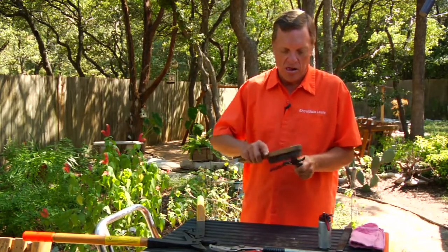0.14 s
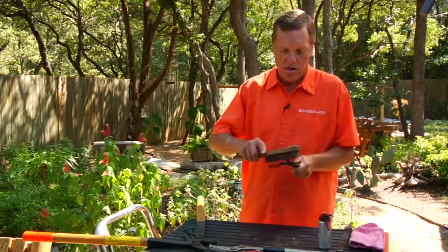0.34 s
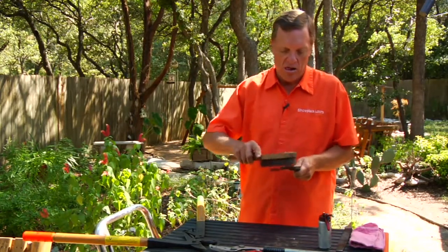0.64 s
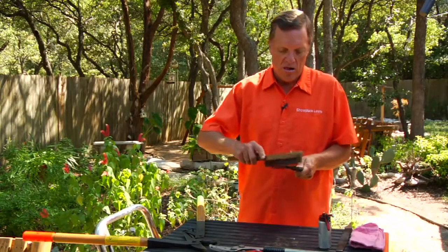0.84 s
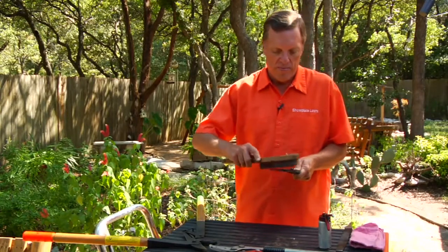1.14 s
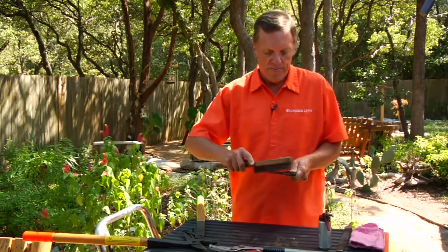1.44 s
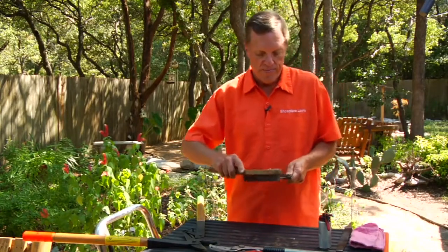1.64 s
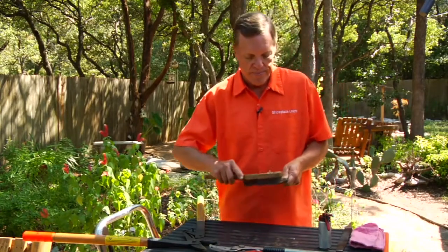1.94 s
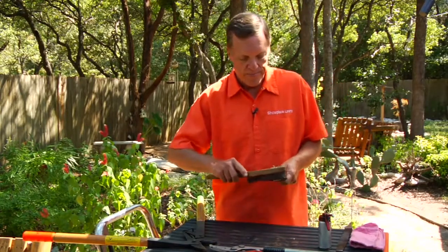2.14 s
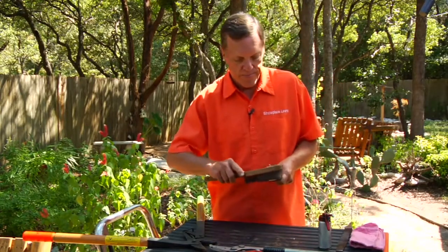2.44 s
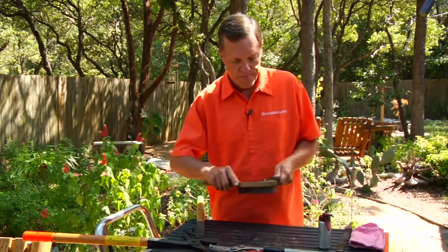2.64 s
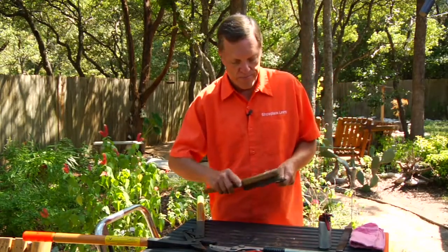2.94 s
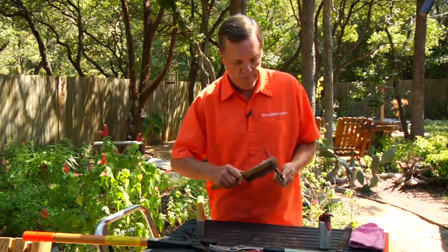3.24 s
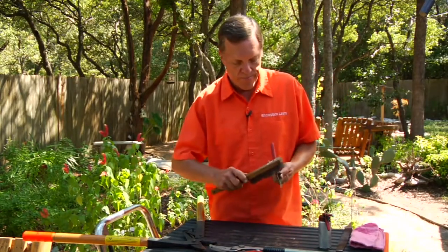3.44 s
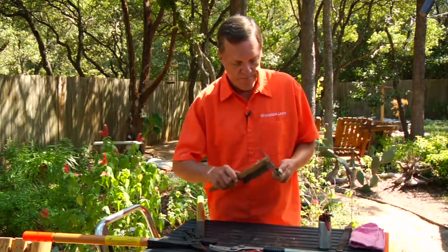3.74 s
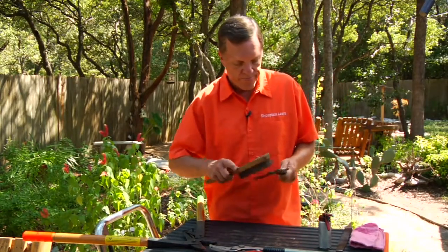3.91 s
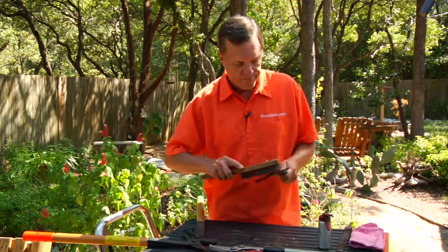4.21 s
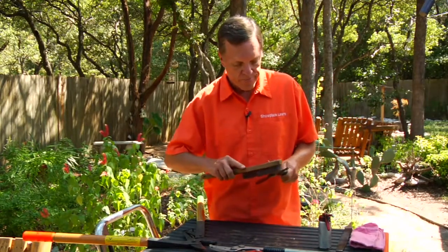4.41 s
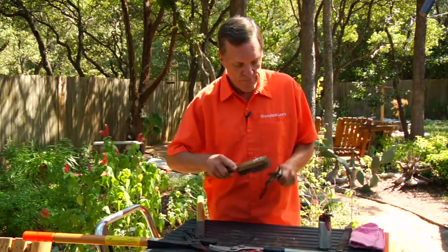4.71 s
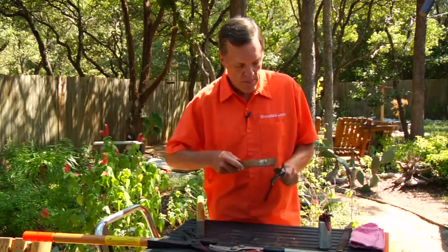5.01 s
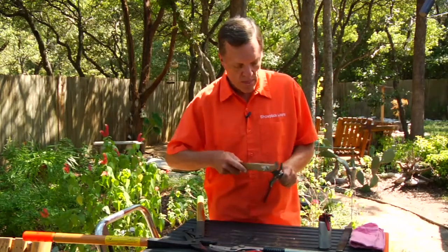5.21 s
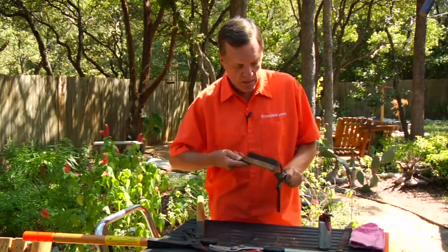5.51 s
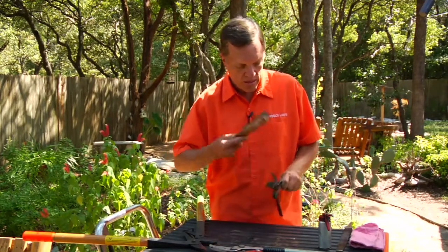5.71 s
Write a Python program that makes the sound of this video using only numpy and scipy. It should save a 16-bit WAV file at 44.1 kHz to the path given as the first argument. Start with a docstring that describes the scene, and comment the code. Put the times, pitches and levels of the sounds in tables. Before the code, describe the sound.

A stiff wire brush scrubs steel pruner jaws in short, scratchy, uneven strokes, with faint metallic rings and soft cloth rumble outdoors.

```python
"""A garden: a stiff wire brush scrubs the steel jaws of hand pruners, heard by one lapel microphone. Bristles
scratch as dense, uneven noise and plucked wires; whole tufts snap off the blade edges as short bursts. Both
drive resonances of the wires, the jaws, the blade tip and the wooden handle, which also gives a low knock. The
blade rings free now and then as damped tones, small dull taps tick, and the yard answers with a faint tail. The
working arm rumbles through the shirt; far traffic and microphone hiss fill the gaps."""
import sys
import numpy as np
from scipy import signal
from scipy.fft import rfft, irfft, next_fast_len
from scipy.io import wavfile
from scipy.ndimage import uniform_filter1d, map_coordinates

SR = 44100
rng = np.random.default_rng(int(sys.argv[2]) if len(sys.argv) > 2 else 0)


def int16_out(signal):
    """Quantize to a 16-bit WAV file."""
    q = np.round(np.clip(np.atleast_2d(signal).T, -1, 1) * 32767)
    wavfile.write(sys.argv[1], SR, q.astype(np.int16))


N = 258514

# Strokes of the brush along the blade: (touch time [s], rise [s], hold [s], scratch at full press [dB],
# scratch at lift [dB], trailing wires [dB], then rings against the scratch at touch: jaw [dB], tip [dB],
# handle [dB]; loudest tip mode: pitch at touch [Hz], pitch at lift [Hz], drive gain at lift [dB])
STROKES = [(0.202, .095, 0.12, -44, -60, -86.5, -1.5, -7, -8, 4250, 4170, -7),
           (0.553, 0.072, 0.07, -48, -49, -79, -3.5, -8, -16, 4150, 4070, 0.5),
           (0.953, 0.079, 0.05, -46, -55, -68.5, -3, -8, -15.5, 4000, 4002, 1),
           (1.267, 0.068, 0.039, -47, -45, -66.5, -3.5, -10.5, -14, 3930, 4160, 1),
           (1.577, 0.069, 0.052, -44.5, -60, -67.5, -3.5, -7.5, -10, 4150, 4150, 0),
           (1.903, 0.08, 0.052, -43.5, -58.5, -82.5, -6, -7.5, -12, 4250, 4130, 0.5),
           (2.262, .04, 0.081, -46.5, -52, -87, -6.5, -4, -15, 4300, 4300, -2),
           (2.576, 0.08, 0.019, -41.5, -41.5, -71.5, -3.5, -4, -11, 4300, 4300, -3.5),
           (2.958, 0.043, .033, -42, -47, -70, -8, -7, -12, 4350, 4170, -2),
           (3.555, 0.09, 0.018, -50, -46.5, -73, -7, -4, 0.5, 4350, 4300, -5),
           (4.252, 0.1045, 0.0552, -54.5, -62.5, -81, 3, -3, -2.5, 4100, 3920, -1.5),
           (4.405, 0.0433, 0.068, -61.5, -58.5, -66.5, 3.5, -4, -4, 4100, 3830, -9),
           (4.532, .13, 0.044, -45.5, -56, -74, -0.5, -5.5, -4, 3800, 4190, -1.5),
           (5.136, 0.0068, 0.0723, -67.5, -67, -82.5, 5.5, -2.5, -1, 4450, 4490, -5),
           (5.277, 0.0078, 0.174, -72.5, -66.5, -62, 6, -3, 2.5, 4450, 4450, -3.5),
           (5.518, .01, 0.078, -58.5, -69, -68, 3, -2, 3, 4450, 4450, -0.5),
           (5.588, 0.047, 0.048, -51.5, -68, -83, 4.5, -5.5, 5.5, 4450, 4535, -2.5)]
# Jolts at landings and within strokes shake the microphone and knock the handle: (time [s], jolt dip [dB],
# knock drive [dB])
JOLTS = [(0.165, -53, -49), (0.227, -57, -55.5), (0.681, -56, -41.5), (1.234, -47.5, -45),
         (1.37, -70.5, -45), (1.882, -41.5, -39.5), (2.203, -52, -55), (2.661, -45.5, -40.5),
         (2.672, -75.5, -45.5), (2.937, -37, -43.5), (3.016, -51, -45), (5.143, -57, -67),
         (5.621, -59, -42), (5.637, -71, -39)]


def amp(db):
    """Decibels to gain."""
    return 10 ** (np.asarray(db) / 20)


def unit(x):
    """Scaled to rms 1."""
    return x / np.sqrt(np.mean(x ** 2) + 1e-20)


def along(points, hz):
    """(Hz, value) points read on a log frequency axis."""
    f, v = np.transpose(points)
    return np.interp(np.log(hz + 1), np.log(f + 1), v)


def curves(rows):
    """One value per sample for each column after the time."""
    s, *columns = np.transpose(rows)
    return [np.interp(np.arange(N) / SR, s, column) for column in columns]


def wobble(rate):
    """A smooth random curve, rate knots a second."""
    knots = rng.standard_normal(int(N * rate / SR) + 4)
    return map_coordinates(knots, [np.arange(N) * rate / SR])


def filtered(x, response):
    """x through a frequency response, scaled so that white noise keeps its power."""
    m = next_fast_len(N + SR // 2)
    gain = response(np.fft.rfftfreq(m, 1 / SR))
    gain = gain / np.sqrt(np.mean(abs(gain) ** 2))
    return irfft(rfft(x, m) * gain, m)[:N]


def modes(table):
    """Causal resonances with steep skirts: each acts twice, the second time three times as wide."""
    def one(f, centre, width):
        return 1j * f * width / (centre * centre - f * f + 1j * f * width)

    def response(f):
        total = 0
        for k, (centre, width, db) in enumerate(table):
            sign = (-1) ** k  # neighbours alternate in polarity
            total = total + sign * amp(db) * one(f, centre, width) * one(f, centre, 3 * width)
        return total
    return response


def colour(points):
    """A smooth spectrum through (Hz, dB) points."""
    return lambda hz: amp(along(points, hz))


def garden():
    """Far traffic, slightly uneven, over steady hiss: two coloured noises."""
    # Slow course of the traffic: (time [s], level [dB])
    traffic_course = [(0, -69.5), (.64, -66), (1.9, -67.5), (2.68, -67), (3.38, -70), (3.7, -67),
                      (4.03, -70), (4.65, -66), (5.04, -68.5), (5.86, -67.5)]
    # Spectrum of the far traffic: (frequency [Hz], relative density [dB per Hz])
    traffic_colour = [(71, -28), (120, -5), (226, -9), (284, -9.5), (414, -9), (449, -10), (942, -12.5),
                      (1950, -25.5), (3000, -50), (3900, -66), (6600, -120)]
    # Spectrum of the microphone hiss: (frequency [Hz], relative density [dB per Hz])
    hiss_colour = [(1000, -12.5), (2500, 3.5), (5000, -1.5), (8000, -3.5), (12000, -2.5), (16000, -0.5)]
    hiss_db = -79
    level = amp(curves(traffic_course)[0] + 0.23 * wobble(11))
    traffic = level * filtered(rng.standard_normal(N), colour(traffic_colour))
    hiss = amp(hiss_db) * filtered(rng.standard_normal(N), colour(hiss_colour))
    return traffic + hiss


def shirt(press):
    """The arm rumbles the microphone on the cloth, more while it works; a jolt dips fast and rebounds slower."""
    # Rumble before effort and wobble: (time [s], level [dB])
    arm_course = [(0, -68), (.23, -58), (.44, -69), (.78, -63), (1.19, -69.5), (1.6, -62.5), (1.83, -69),
                  (1.89, -57.5), (2.15, -69), (2.66, -66), (2.92, -73), (2.94, -65), (3.07, -65.5),
                  (3.36, -74.5), (3.62, -64.5), (3.95, -77.5), (4.42, -65.5), (5.07, -69), (5.63, -65),
                  (5.86, -70)]
    # Spectrum of the cloth rumble: (frequency [Hz], relative density [dB per Hz])
    cloth_colour = [(15, -8), (25, -2), (45, -4.5), (80, -4.5), (130, -20.5), (250, -47.5)]
    effort_db, effort_from_db, effort_s = 3, -63, 0.013  # most extra rumble; half-way scratch level; smoothing
    jolts, t = np.zeros(N + SR), np.arange(SR // 20) / SR
    dip = np.exp(-((t - .002) / 0.0017) ** 2)
    rebound = .5 * np.exp(-((t - .008) / 0.0036) ** 2)
    for s, db, _ in JOLTS:
        jolts[round(s * SR):][:len(t)] += amp(db) * (rebound - dip)
    working = uniform_filter1d(press / (press + amp(effort_from_db)), round(effort_s * SR))
    level = amp(curves(arm_course)[0] + effort_db * working + 1.5 * wobble(9.3))
    return jolts[:N] + level * filtered(rng.standard_normal(N), colour(cloth_colour))


def crowd(gains, count):
    """Lesser snaps at random moments, about as strong and as ringing as the scratch around them."""
    over_scratch_db, scatter_db = -1, 3
    steel_db, wood_db, ring_scatter_db = -1, -1, 3  # rings over those of the scratch
    s = rng.random(count) * N / SR
    chance = rng.standard_normal((count, 3))
    db, jaw_db, _, handle_db = 20 * np.log10(gains[:, (s * SR).astype(int)] + 1e-9)
    rings_db = np.c_[jaw_db - db + steel_db, handle_db - db + wood_db]
    burst_db = db + over_scratch_db + scatter_db * chance[:, 0]
    return np.c_[s, burst_db, rings_db + ring_scatter_db * chance[:, 1:]]


def snap_shape():
    """Sharp rise and a 60 dB fall in 14 ms."""
    t = np.arange(SR // 30) / SR
    return amp(-60 * t / .014) * (1 - np.exp(-t / .0005))


def add_snaps(drive, gains, wires):
    """Tufts snap as noise bursts that drive the wires, the jaws, the tip, the handle and its low knock."""
    # Tufts heard singly as they land or snap free:
    # (time [s], burst [dB], steel ring against burst [dB], wood ring against burst [dB])
    single_snaps = [(.1632, -43, 0.5, -13), (.1824, -46, 4, -3), (.209, -55, -18, -25),
                    (.217, -53.5, -2.5, -12), (.225, -34.5, 4.5, -10), (.2375, -34, -20, -13),
                    (.2575, -31, -12, -14), (.2661, -39, -8, -13), (.2834, -48, -17, -14),
                    (.3113, -43, 7.5, -14.5), (.3362, -43, 4, -20), (.3581, -37.5, -5.5, -22),
                    (.4999, -54, 2, 9), (.5839, -48, -7, -10.5), (.619, -42.5, -2, -3),
                    (.6286, -38, -25, -30), (.641, -38, -27, -34), (.653, -37, -20, -25),
                    (.664, -33, -12, -24), (.6754, -29, -15.5, -28.5), (.6929, -35.5, -17, -22),
                    (.9234, -48, -23.5, -19.5), (.9498, -56.5, -1.5, -9), (.9693, -41, -2, -11),
                    (1.0379, -33, -26, -32.5), (1.0486, -40.5, -20.5, -33.5), (1.0631, -30, -17, -32),
                    (1.0791, -41, -9, -25), (1.2326, -40, -3.5, -22), (1.2432, -39.5, 2, -8.5),
                    (1.2736, -48, 3, -17), (1.2808, -46, -2, -19), (1.334, -33.5, -9, -14.5),
                    (1.35, -40, -9, -28), (1.3699, -35.5, -15, -25.5), (1.54, -49.5, -3.5, -17.5),
                    (1.5473, -47, -3, -15), (1.5768, -44.5, 0.5, -6), (1.6073, -44.5, -1, -4),
                    (1.6505, -30, -11.5, -20), (1.6629, -32, -17, -32), (1.6702, -37.5, -15, -24),
                    (1.6821, -32.5, -24, -30), (1.6939, -37, -11, -26), (1.882, -45, 11.5, -6),
                    (1.8872, -44, 1.5, -2), (1.9151, -35.5, -4, -11), (1.9552, -43.5, -9, -16),
                    (1.9903, -31.5, -41, -19), (2.002, -32, -27, -33), (2.0215, -48, -2, -25),
                    (2.0289, -35, -33, -18), (2.0384, -40.5, -17, -8), (2.196, -49.5, -8.5, -20),
                    (2.203, -38, 0.5, -17), (2.2329, -54, -9, -11), (2.2625, -55, 2, -22),
                    (2.3294, -38, -12, -16), (2.3455, -35, -14, -20), (2.353, -36.5, -8, -17),
                    (2.3611, -34.5, -16, -27), (2.3773, -34.5, -25, -36), (2.5278, -59, -13.5, -26),
                    (2.5457, -46, 1, -23), (2.5844, -49.5, 1.5, -24), (2.62, -42.5, 8, -15),
                    (2.6414, -36, -0.5, -21), (2.662, -29, -14, -21), (2.6718, -37.5, -12, -25),
                    (2.9368, -29, -1.5, -13.5), (2.9449, -50, 11, 2), (2.9503, -36, -9, -10),
                    (2.9629, -42.5, 2, -5), (2.995, -42, -19, -22.5), (3.004, -39, -11.5, -21),
                    (3.008, -29.5, -10, -20), (3.0141, -31.5, -9.5, -14.5), (3.0226, -30, -11, -21),
                    (3.0286, -31.5, -15, -15), (3.4621, -53.5, 0.5, -10), (3.492, -62, 5, -7),
                    (3.504, -66.5, -4.5, -2.5), (3.5417, -47.5, -9, -5), (3.5504, -48, 1, -2),
                    (3.5762, -52, 2, -16), (3.5929, -34.5, -4.5, -25), (3.6108, -50, -14, -8),
                    (3.62, -36.5, -10, -29), (3.6335, -39, -10, -9), (3.6424, -31.5, -17, -30),
                    (3.6635, -38, -6, -14.5), (3.8499, -54.5, 5, -8), (4.2555, -56.5, 0, -15.5),
                    (4.2768, -48, -11, -25), (4.3134, -42.5, -11, -5.5), (4.3395, -40, -12, -15),
                    (4.3604, -44, -4, -1), (4.382, -48, -9, 3.5), (4.4609, -60.5, -6, -12),
                    (4.4733, -54.5, 8.5, -4.5), (4.518, -54.5, -13, -18), (4.5684, -65, 12, -11),
                    (4.6524, -40, -12, -3), (4.687, -31, -16, -28), (5.1424, -41, -9, -13),
                    (5.1633, -50.5, -14, -7), (5.17, -49.5, -8, -6.5), (5.287, -44, -17.5, -8),
                    (5.2909, -45.5, -9, -6), (5.3209, -51, -18, -13.5), (5.3684, -41, -12, -15),
                    (5.404, -44.5, -6, -7.5), (5.4556, -53, -4, 1), (5.4844, -42.5, -5.5, -10),
                    (5.4928, -51, 7.5, -9.5), (5.5296, -51, 4, 4), (5.5499, -46, -11, -16),
                    (5.5826, -63, 14, 7), (5.5962, -59, 7, -8), (5.6182, -29.5, -4, -1),
                    (5.636, -34.5, 2.5, -1), (5.6502, -30.5, -13, -6)]
    tip_db, tip_share = 4, 0.56  # tip ring over that of the scratch, plus a share of the steel ring
    knock_db, knock_share = -11, 0.4  # knock against the burst, plus a share of the wood ring
    shape = snap_shape()
    size = len(shape)
    gains = np.pad(gains, ((0, 0), (0, SR)), 'edge')
    for s, db, steel_db, wood_db in np.r_[single_snaps, crowd(gains[:, :N], count=240)]:
        noise = shape * rng.standard_normal(size)
        at, burst = round(s * SR), amp(db) * np.linalg.norm(shape)
        # each snap takes the colour of the wires that it plucks
        pluck = 1.33 * noise + shape * wires[at:][:size]
        rings = amp([steel_db, tip_db + tip_share * steel_db, wood_db, knock_db + knock_share * wood_db])
        rings[1] *= gains[2, at + 88] / (gains[0, at + 88] + 1e-9)  # tip ring of the scratch 2 ms later
        drive[0, at:][:size] += burst * pluck / np.linalg.norm(pluck)
        drive[1:, at:][:, :size] += burst * rings[:, None] * noise / np.linalg.norm(noise)


def add_knocks(drive):
    """Jolts knock the handle with bursts shaped like snaps."""
    shape = snap_shape()
    for s, _, db in JOLTS:
        noise = shape * rng.standard_normal(len(shape))
        burst = amp(db) * np.linalg.norm(shape)
        drive[4, round(s * SR):][:len(shape)] += burst * noise / np.linalg.norm(noise)


def contact():
    """Gain of the scratch, then of jaw, tip and handle: strokes rise, hold and let go; landings die away."""
    # The brush lands and scuffs: (time [s], scratch [dB], t60 [s],
    # then rings against the scratch: jaw [dB], tip [dB], handle [dB])
    landings = [(.164, -61, 0.1, -9.5, -5.5, -13.5), (0.497, -60.5, 0.21, -0.5, -4, -2.5),
                (0.92, -50, .07, -3, -1.5, -13), (1.234, -59.5, 0.16, -2, -10, -12),
                (1.536, -58.5, 0.195, -4, 0, -9), (1.882, -51.5, 0.13, 3, -1, -15),
                (2.198, -52.5, 0.0754, 0, -6, -21), (2.232, -70, 1, 2, -2, -10),
                (2.526, -51.5, 0.163, -5, -2, -25), (2.938, -47, 0.099, -4.5, 1.5, -16),
                (3.455, -71.5, 0.85, 1, 1.5, -4), (3.541, -59.5, 0.33, -1, 6.5, -7),
                (3.845, -84, 0.38, -3, 0, -1), (4.212, -69.5, .3, -1, 2, -5),
                (5.232, -72, 0.44, -7, 5.5, -3)]
    # Change of the rings against the scratch from touch to lift: jaw [dB], tip [dB], handle [dB]
    slide_db = -10, 2.5, -7
    attack_bend = 1.15  # power of the rise
    release_t60, trail_t60 = 0.013, 0.38  # s
    trail_ring_db = -2  # trailing wires ring the tool less
    power = np.zeros((4, N + SR))
    for touch, rise, hold, full_db, lift_db, trail_db, *ring_db in np.array(STROKES)[:, :9]:
        t = touch + np.arange(SR // 2) / SR
        full, lift = touch + rise, touch + rise + hold
        after = np.maximum(t - lift, 0)
        along_blade = np.clip((t - touch) / (lift - touch), 0, 1)
        rising = np.minimum((t - touch) / (full - touch), 1) ** attack_bend
        held = rising * amp(np.interp(t, [full, lift], [full_db, lift_db]) - 60 * after / release_t60)
        trail = (t > lift) * amp(trail_db - 60 * after / trail_t60)
        trail = trail * amp([0, *[trail_ring_db] * 3])[:, None]
        rings = amp([0 * t, *(db + change * along_blade for db, change in zip(ring_db, slide_db))])
        power[:, round(touch * SR):][:, :len(t)] += ((held + trail) * rings) ** 2
    t = np.arange(SR // 2) / SR
    for s, db, t60, *ring_db in landings:
        scuff = amp(db - 60 * t / t60) * amp([0, *ring_db])[:, None]
        power[:, round(s * SR):][:, :len(t)] += scuff ** 2
    return np.sqrt(abs(uniform_filter1d(power[:, :N], size=88)))  # smoothed over 2 ms


def scratch(grain_db, clump_db):
    """Wire tips slip over steel: noise whose strength jumps by the millisecond and clumps by tuft row."""
    strength = amp(grain_db * wobble(700) + clump_db * wobble(140))
    return unit(rng.standard_normal(N) * strength)


def pings(count, size_db, t60):
    """Single wires plucked at random, each ringing briefly at a pitch of its own."""
    when, pitch, size = rng.random((count, 3)).T[..., None]
    k = np.arange(SR // 150)
    decay = amp(-size_db * np.log(size) - 60 * k / SR / t60)
    ring = decay * np.sin(2 * np.pi * (5500 + 10500 * pitch) * k / SR)
    return unit(np.bincount(((when * N).astype(int) + k).ravel(), ring.ravel())[:N])


def edge(drive, width_hz):
    """The loudest tip mode slides and swells along each stroke; cross-faded between fixed resonances."""
    swell_db, step_hz = 8, 150  # growth from touch to lift; spacing of the resonances
    path = []
    for touch, rise, hold, *_, from_hz, to_hz, lift_db in STROKES:
        path.append((touch, from_hz, lift_db - swell_db))
        path.append((touch + rise + hold, to_hz, lift_db))
    hz, db = curves(path)
    out = np.zeros(N)
    for centre in np.arange(3700, 4751, step_hz):
        near = np.sqrt(np.clip(1 - abs(hz - centre) / step_hz, 0, 1))
        out += filtered(drive * amp(db) * near, modes([(centre, width_hz, 0)]))
    return out


def turned_grip(wire):
    """Turning the tool shifts the level of the wires' top, above 11 kHz."""
    # Treble change as the tool turns: (time [s], gain [dB])
    grip = [(0, 2.5), (4.9, 3.5), (5.1, -2), (5.86, -4)]
    top = filtered(wire, lambda hz: hz > 11000)
    top = top * np.dot(top, wire) / np.dot(top, top)  # back to its own level within the wires
    return wire + (amp(curves(grip)[0]) - 1) * top


def brush(gains):
    """Scratch and snaps drive resonant bodies: the wires, the jaws, the tip, the handle and its low knock."""
    # Spectrum of the wires: (frequency [Hz], relative density [dB per Hz])
    wire_colour = [(3240, -13), (5500, -28.5), (6670, -7), (8560, -0.5), (11200, -3.5), (13000, -1.5),
                   (15200, -10.5), (16000, -2)]
    # Resonances of the jaws: (frequency [Hz], width [Hz], relative level [dB])
    jaw_modes = [(2299, 448, 3), (2550, 620, -1), (3152, 398, 2)]
    # Resonances of the blade tip: (frequency [Hz], width [Hz], relative level [dB])
    tip_modes = [(3660, 540, 4.5), (4820, 127, -3), (5500, 840, 4)]
    # Resonances of the wooden handle: (frequency [Hz], width [Hz], relative level [dB])
    handle_modes = [(1690, 189.4, -2), (2026, 250, -1)]
    # Low knock resonances of the handle: (frequency [Hz], width [Hz], relative level [dB])
    knock_modes = [(325, 630, 2), (683, 57, 10.5), (1225, 1140, -3.5)]
    wander_db, wander_rate = 1, 30  # each body is caught now more, now less; knots a second
    press = gains[0]
    rub = scratch(grain_db=2.0, clump_db=-1.0)
    wires = np.pad(pings(count=14000, size_db=2.5, t60=0.0145), (0, SR))
    drive = np.zeros((5, N + SR))  # wires, jaws, tip, handle, handle knock
    drive[:, :N] = rub * gains[[0, 1, 2, 3, 0]] * amp([[-2], [0], [0], [0], [-26]])
    drive[1:, :N] *= amp([wander_db * wobble(wander_rate) for _ in drive[1:]])
    drive[0, :N] += press * amp(-5.5) * wires[:N]
    add_snaps(drive, gains, wires)
    add_knocks(drive)
    wire = turned_grip(filtered(drive[0, :N], colour(wire_colour)))
    jaw = filtered(drive[1, :N], modes(jaw_modes))
    tip = amp(-4.0) * filtered(drive[2, :N], modes(tip_modes))
    loudest_tip = edge(drive[2, :N], width_hz=260)
    handle = filtered(drive[3, :N], modes(handle_modes))
    knock = filtered(drive[4, :N], modes(knock_modes))
    return wire + jaw + tip + loudest_tip + handle + knock


def ringing():
    """Damped sine tones: the blade's modes ring free, and short dull taps tick."""
    # The blade rings free, at lifts and once from a tap:
    # (time [s], low mode [dB], middle mode [dB], high mode [dB])
    blade_rings = [(.7, -70, -83, -90), (1.382, -63, -82, -90), (1.735, -92, -71.5, -76),
                   (2.05, -68, -84, -87), (2.384, -66, -78.5, -90), (3.032, -55.5, -83, -88),
                   (4.711, -71, -86, -84)]
    # Free modes of the blade, low to high: (frequency [Hz], t60 [s])
    blade_modes = [(2560, 0.16), (4080, 0.16), (6270, 0.29)]
    # Small dull taps: (time [s], level before the soft onset [dB], pitch [Hz])
    taps = [(2.77, -57.5, 3000), (3.264, -61.5, 3560), (3.301, -58, 2644), (3.96, -71.5, 2200),
            (4.182, -50, 443), (4.182, -47, 916), (4.778, -58.5, 3800), (4.915, -63.5, 4380),
            (5.828, -56, 3500)]
    out, t = np.zeros(N + SR), np.arange(SR // 3) / SR
    onset = 1 - np.exp(-t / 0.00085)

    def tone(hz, db, t60):
        return amp(db - 60 * t / t60) * np.sin(2 * np.pi * hz * t) * onset

    for s, *strengths_db in blade_rings:
        for (hz, t60), db in zip(blade_modes, strengths_db):
            out[round(s * SR):][:len(t)] += tone(hz, db, t60)
    for s, db, hz in taps:
        out[round(s * SR):][:len(t)] += tone(hz, db, 0.0049 + 14 / hz)  # higher taps die sooner
    return out[:N]


def yard(x):
    """Fence and trees answer: a noise tail in which each frequency dies at its own speed."""
    # Decay of the yard: (frequency [Hz], t60 [s])
    decay = [(300, 1), (2000, 0.275), (6000, 0.21), (15000, 0.12)]
    hz, t, z = signal.stft(rng.standard_normal(SR // 2), SR, nperseg=256)
    fading = z * amp(-60 * t / along(decay, hz)[:, None])
    tail = signal.istft(fading, SR, nperseg=256)[1]
    delayed = np.pad(x, (300, 0))  # about 7 ms
    return signal.fftconvolve(delayed, tail / np.linalg.norm(tail))[:N]


def scene():
    """One microphone feeds both channels."""
    gains = contact()
    work = brush(gains) + ringing()
    heard = work + amp(-19.0) * yard(work) + shirt(gains[0]) + garden()
    return np.tile(heard, (2, 1))


def record(dry):
    """A steep low-pass removes the band above the limit."""
    top_hz, slope_hz = 15950, 40
    m = next_fast_len(N + SR // 2)
    keep = 1 / (1 + np.exp((np.fft.rfftfreq(m, 1 / SR) - top_hz) / slope_hz))
    return irfft(rfft(dry, m) * keep, m)[:, :N]


dry = scene()
out = record(dry)
int16_out(out)
```